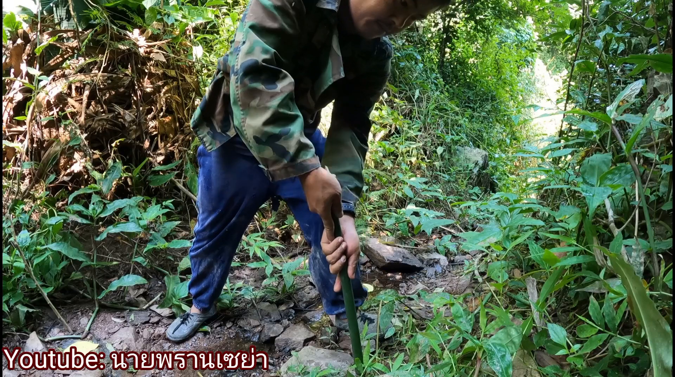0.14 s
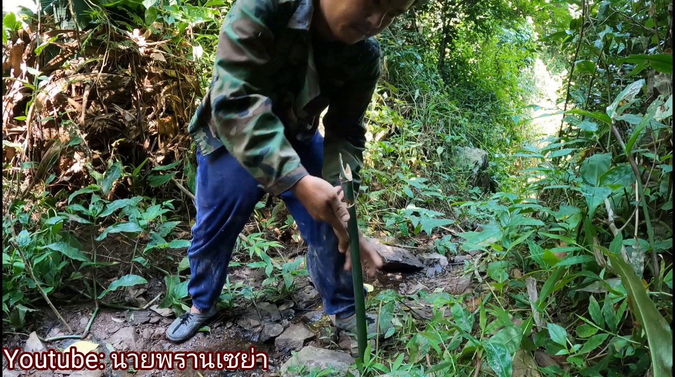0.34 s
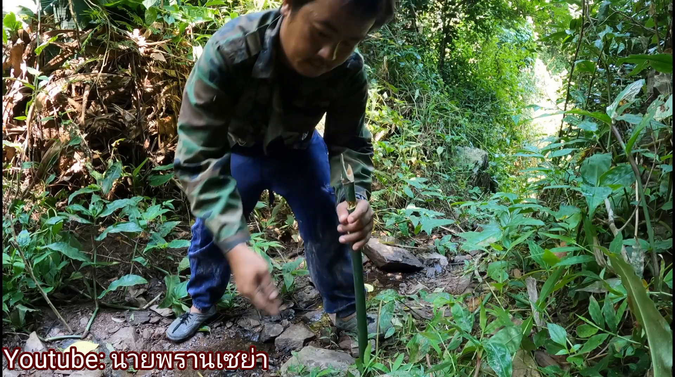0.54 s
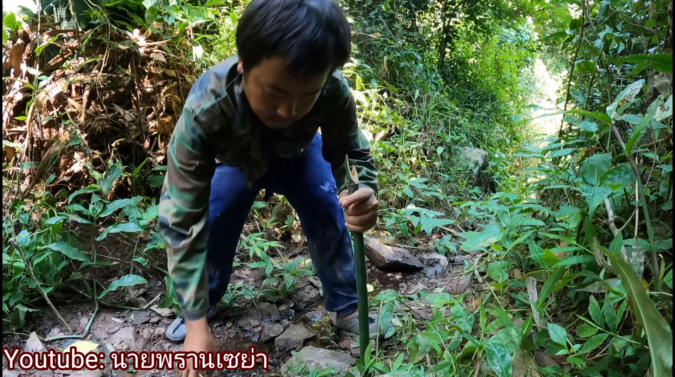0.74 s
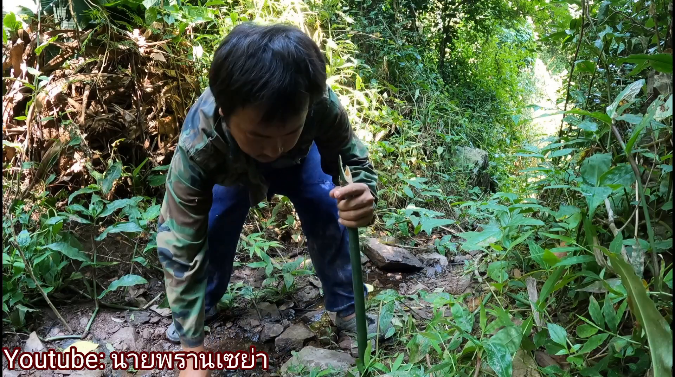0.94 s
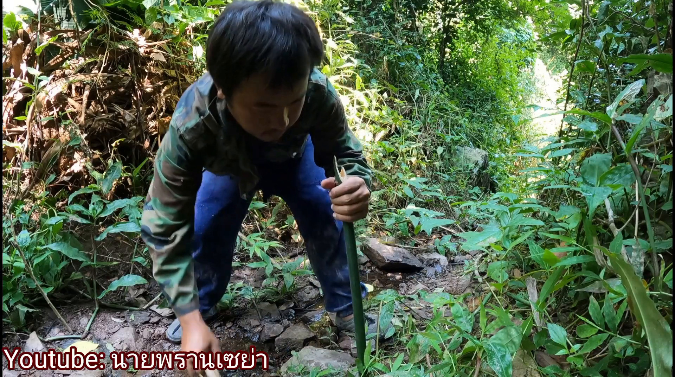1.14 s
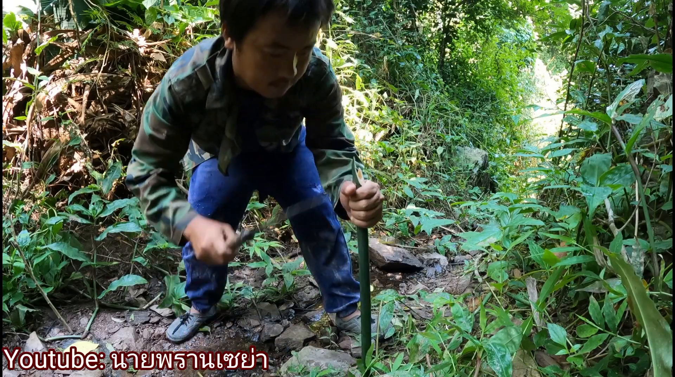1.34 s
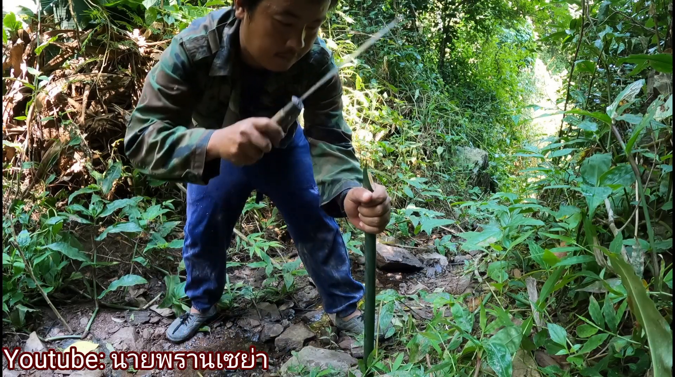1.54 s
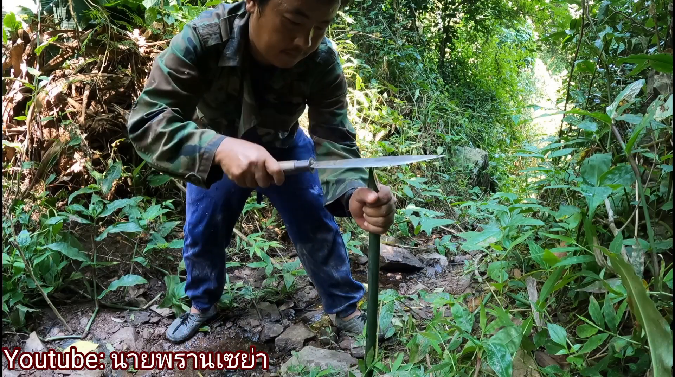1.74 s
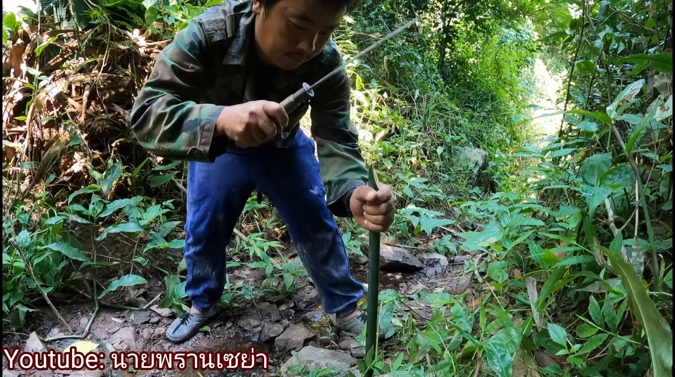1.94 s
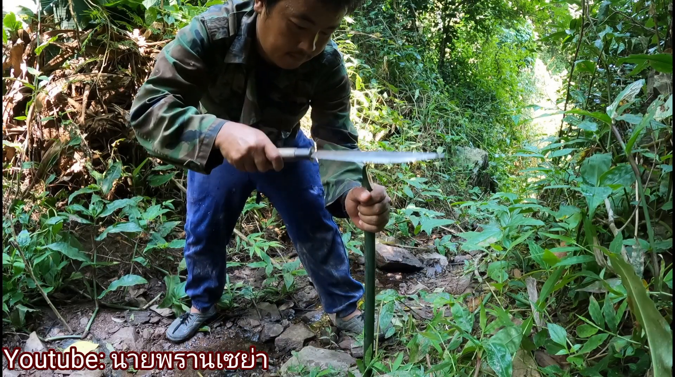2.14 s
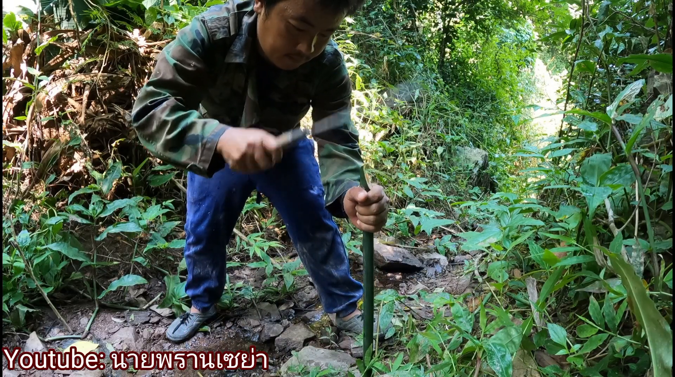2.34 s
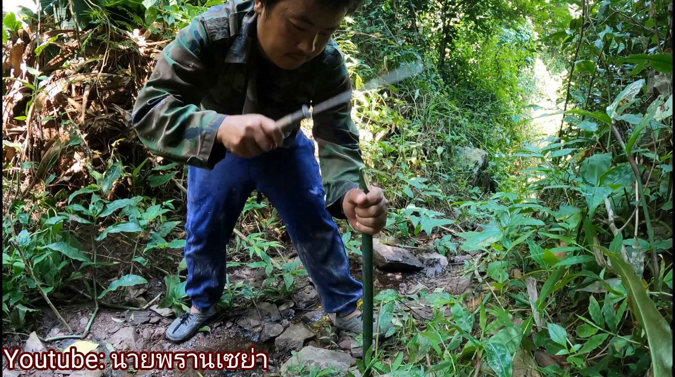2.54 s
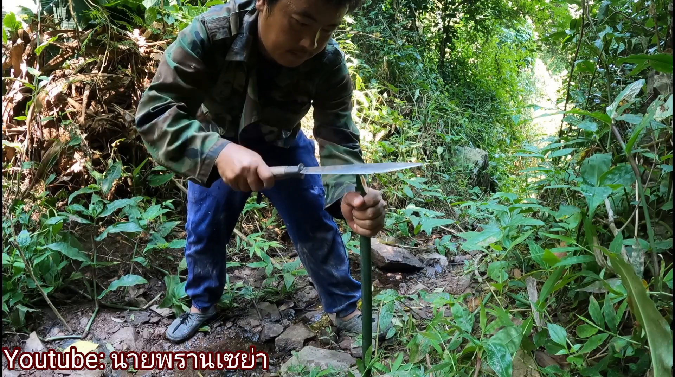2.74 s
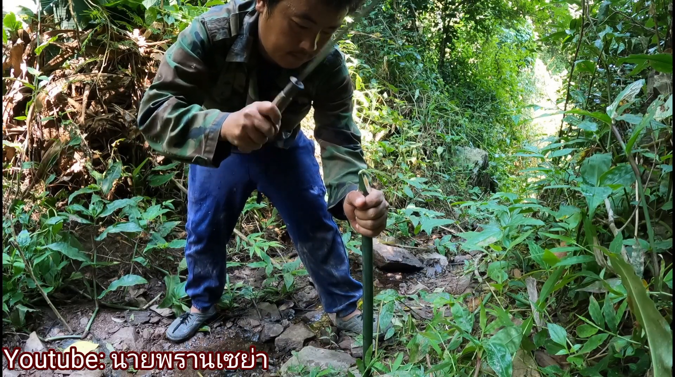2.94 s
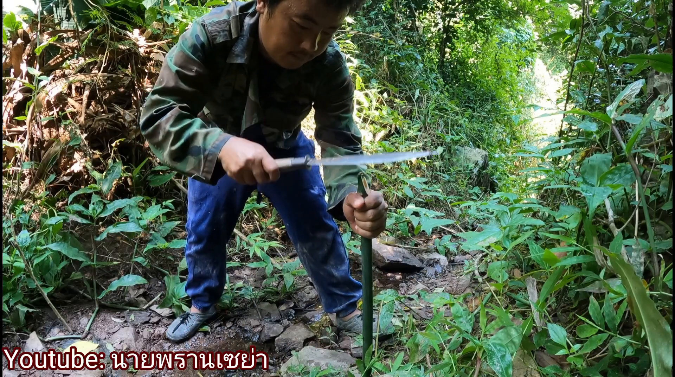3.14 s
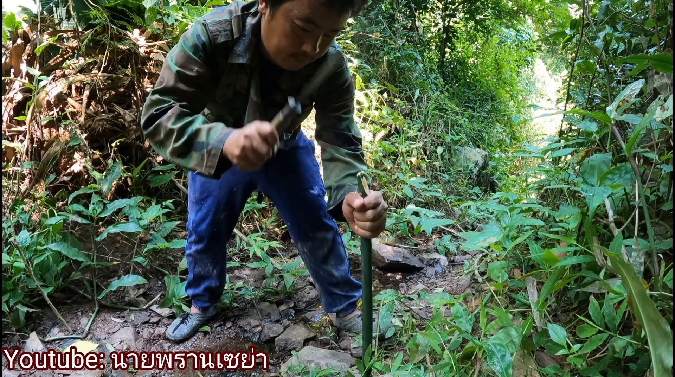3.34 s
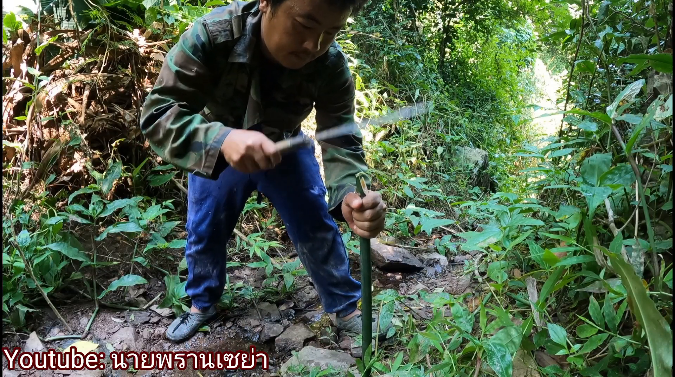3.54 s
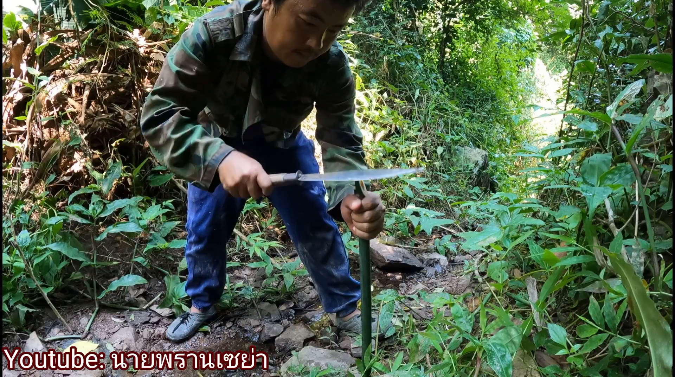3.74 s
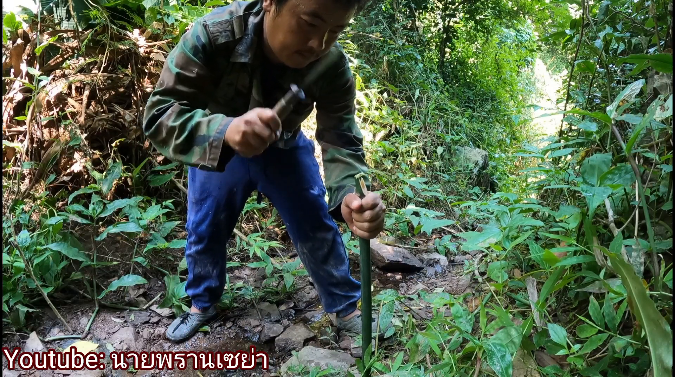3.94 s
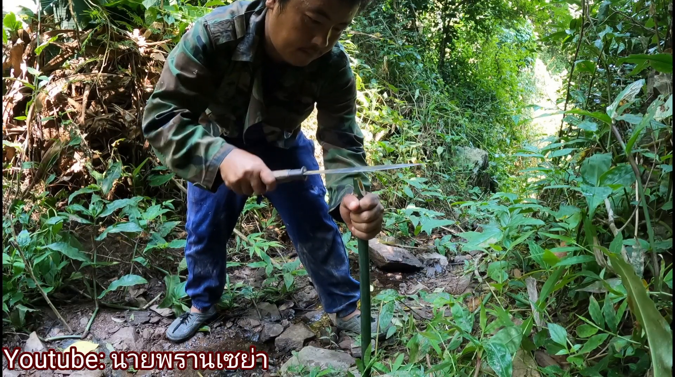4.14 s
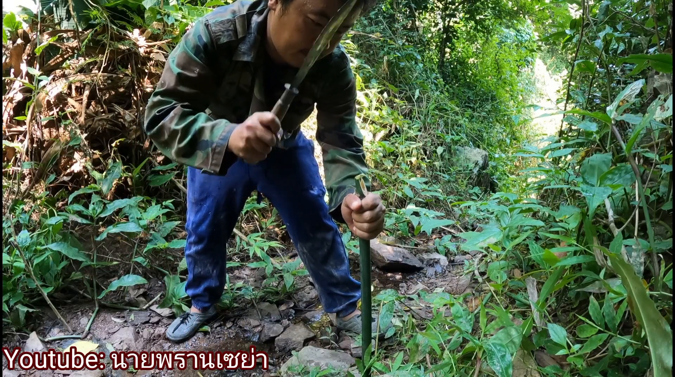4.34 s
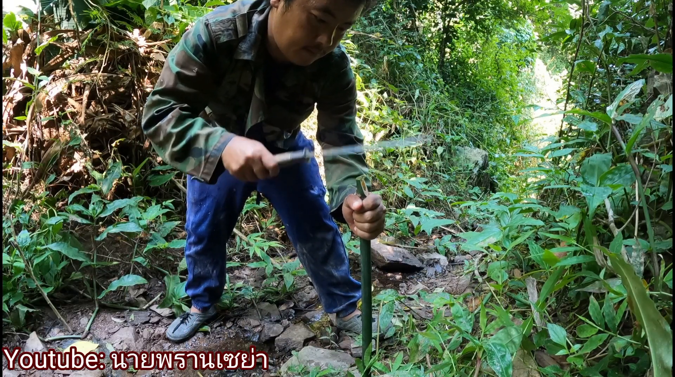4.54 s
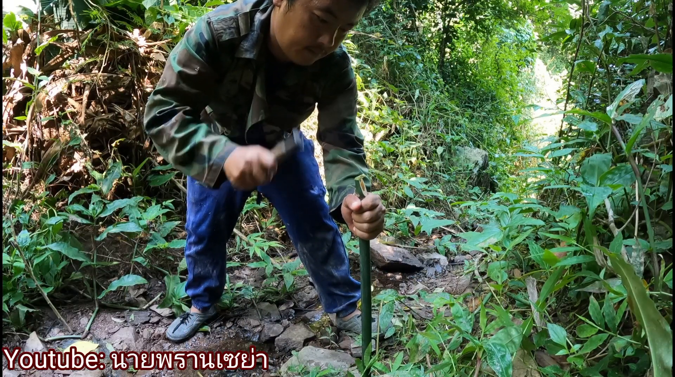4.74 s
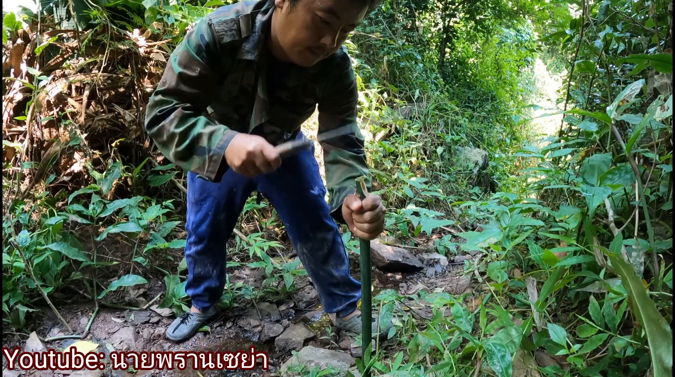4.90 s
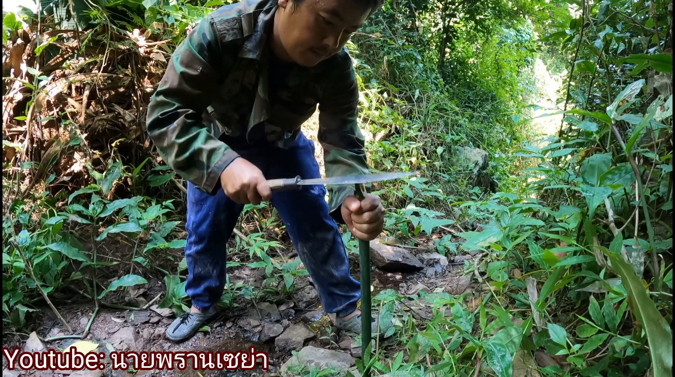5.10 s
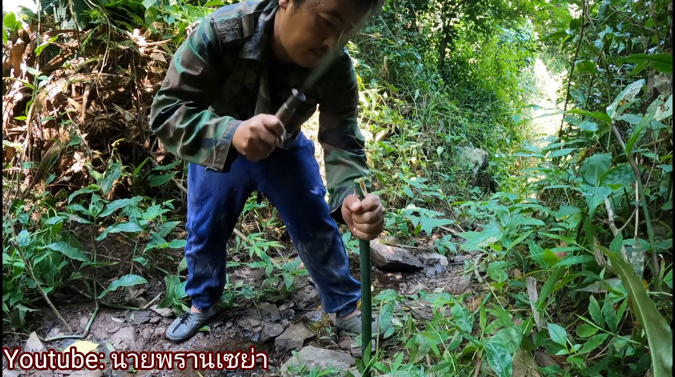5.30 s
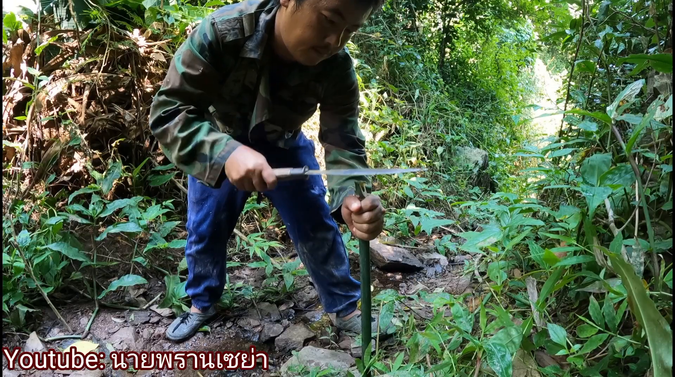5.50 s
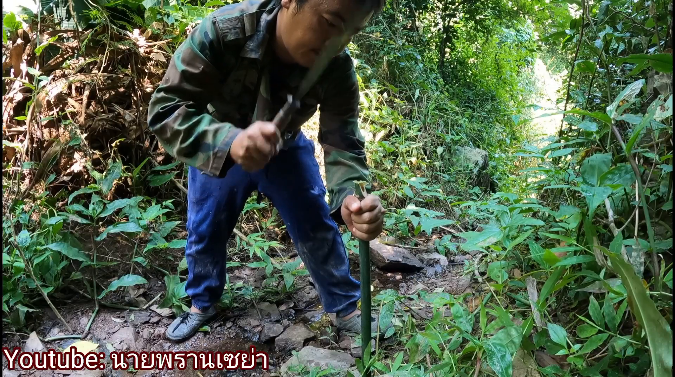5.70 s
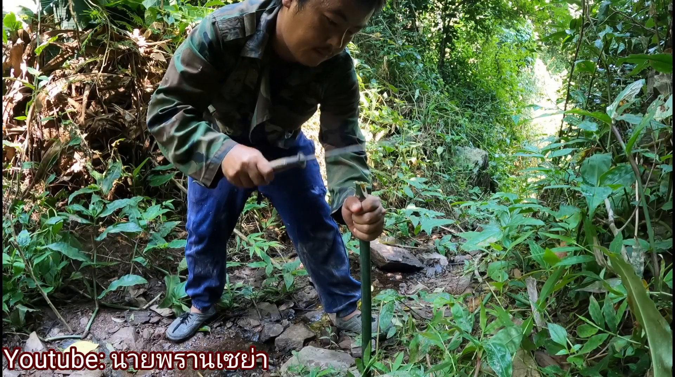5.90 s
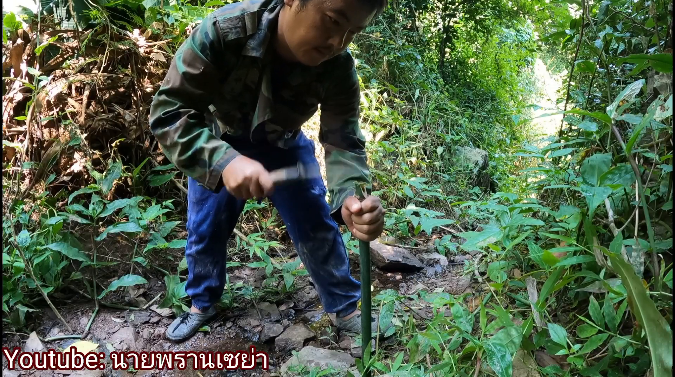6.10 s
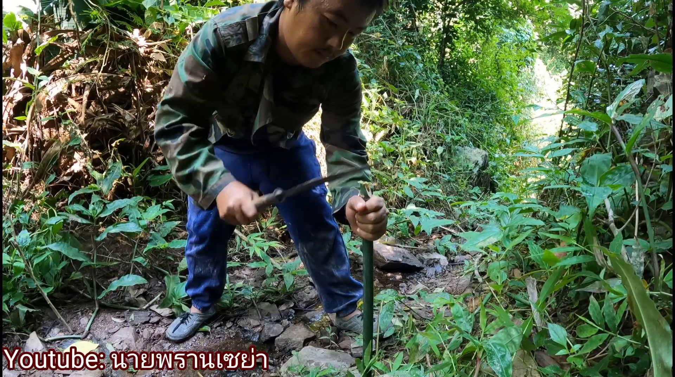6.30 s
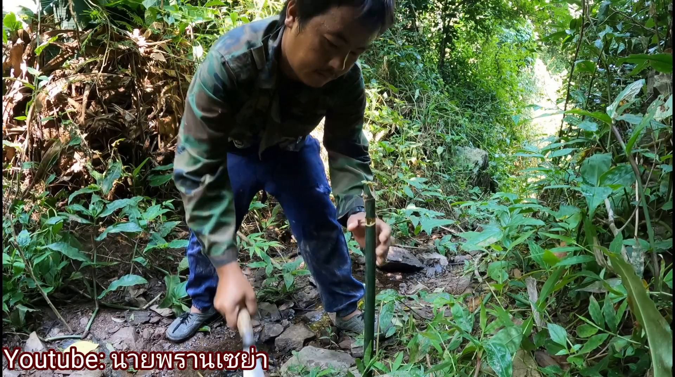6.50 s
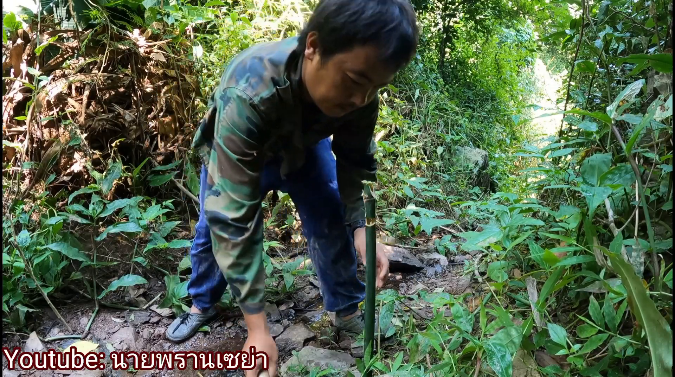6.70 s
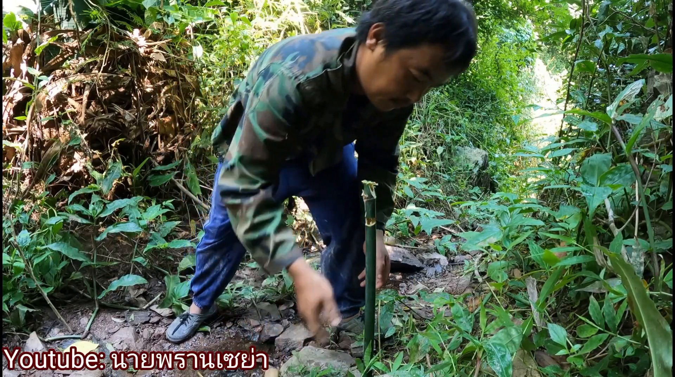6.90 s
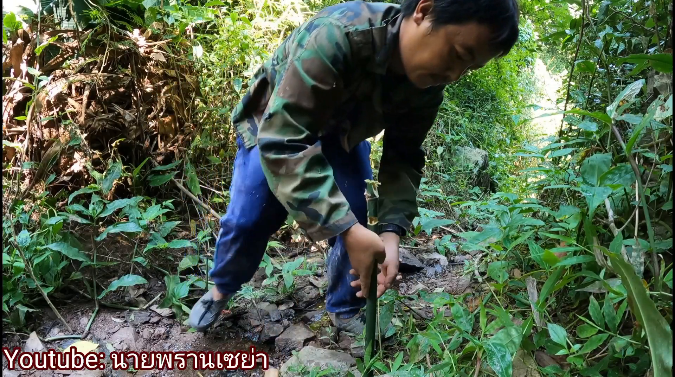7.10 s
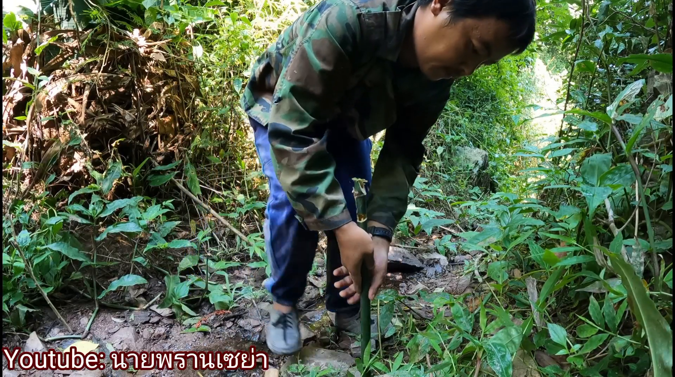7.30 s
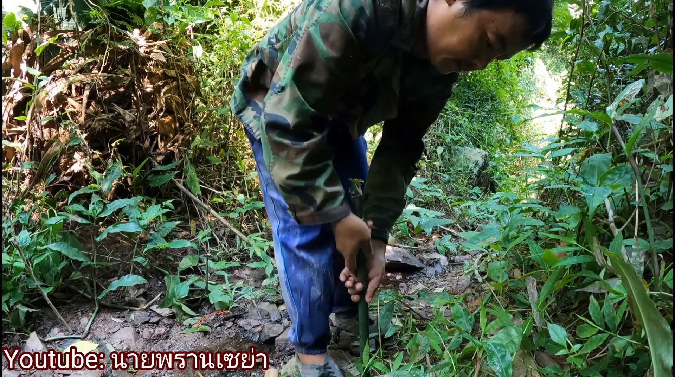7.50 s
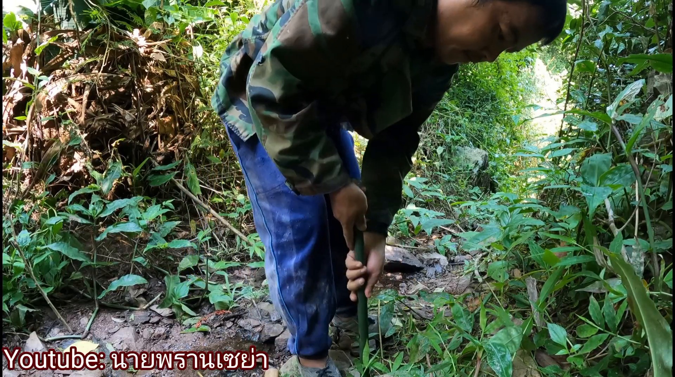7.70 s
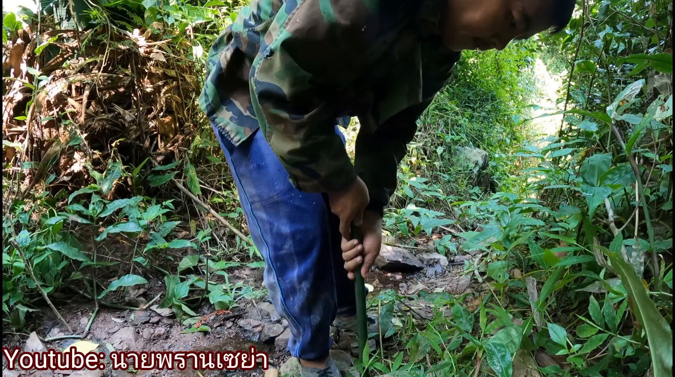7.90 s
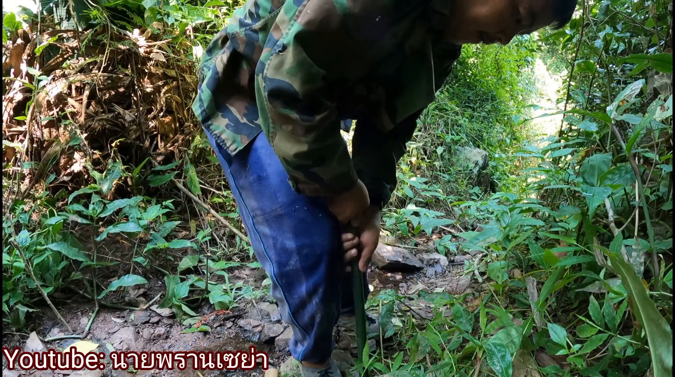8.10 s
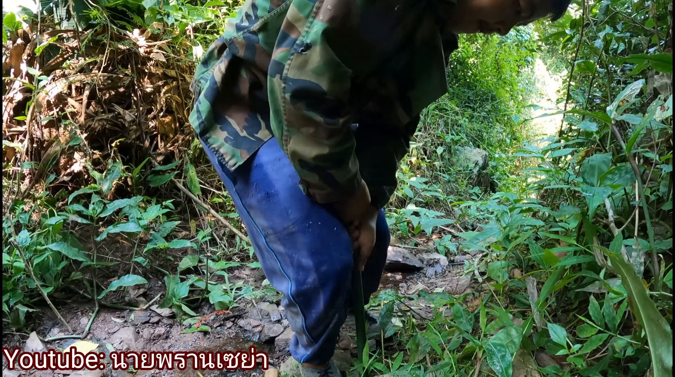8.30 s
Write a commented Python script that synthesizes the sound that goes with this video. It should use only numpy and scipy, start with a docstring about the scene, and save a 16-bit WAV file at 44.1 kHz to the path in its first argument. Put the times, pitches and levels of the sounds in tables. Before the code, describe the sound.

Still forest air, a low hum and thin hiss, lies under the whole scene. From 0 to 1.8 s clothes and leaves rustle softly as a person shifts grip and stoops; small stones tick, with a duller knock near 1.1 s, and soft dull pops bump the microphone, more on the right. From 1.9 to 6.3 s fourteen machete blows strike a bamboo stake, one every third of a second: dry, bright cane clatter, a hard crack at the foot, a short thud and a faint high steel ring. The thud rises in pitch, the rebound weakens and the hollow tone, heard from the third blow, is choked. Brief diffuse echoes return from foliage. At 7.0 s the blade lands on stones with a quick bouncing metallic clatter and scrape. Grit clicks around 7.2 and 7.7 s, cloth rustles more strongly from 7.5 s, and heavy pops thump at 7.6 and 8.1 s.

```python
"""Driving a bamboo stake

On a forest trail, a few steps ahead of two microphones, fourteen machete blows drive a bamboo stake into stony ground.
Filtered noise and dying sines make the cane's clatter, the crack of its foot, the thud and the singing blade.
Noise echoes are the foliage. The blade is thrown onto the stones afterwards, and grit ticks.
Shaped noise is the rustle of clothes and leaves and the still air; slowing sines are dull pops at the microphone."""
import sys
import numpy as np
from scipy import signal
from scipy.fft import irfft
from scipy.io import wavfile
from scipy.ndimage import uniform_filter1d, minimum_filter1d

SR = 44100
rng = np.random.default_rng(int(sys.argv[2]) if len(sys.argv) > 2 else 0)


def generate_wav(sig):
    """Save sig (samples, or channels by samples) to the path in sys.argv[1] as 16-bit PCM at SR."""
    pcm = np.round(np.clip(np.atleast_2d(sig).T, -1, 1) * 32767).astype(np.int16)
    wavfile.write(sys.argv[1], SR, pcm)


N = 368235  # samples in the scene
T = np.arange(SR // 2) / SR  # seconds since a hit
HZ = np.fft.rfftfreq(4096, 1 / SR)  # grid on which all spectra are read


def amp(db):
    """Decibels to gain."""
    return 10 ** (np.asarray(db) / 20)


def evened(x):
    """Scales to an rms of 1."""
    return x / np.sqrt(np.mean(x ** 2) + 1e-20)


def sized(x, db):
    """Scales a hit so that its energy, spread over 30 ms, has this level."""
    return x * amp(db) * np.sqrt(.03 * SR / (np.sum(x ** 2) + 1e-20))


def read(points):
    """Interpolates a spectrum in dB over log frequency, on the HZ grid."""
    hz, db = np.transpose(points)
    return np.interp(np.log(HZ + 1), np.log(hz + 1), db)


def add(mix, start_s, sound):
    """Mixes a sound in at its start."""
    part = mix[..., max(round(start_s * SR), 0):][..., :sound.shape[-1]]
    part += sound[..., :part.shape[-1]]


def decay(t60):
    """Falls by 60 dB in t60 seconds."""
    return np.exp(-np.log(1000) * T / t60)


def colour(x, db):
    """Causal minimum-phase filter with the gain db on the HZ grid."""
    half = np.log(amp(db))
    full = np.r_[half, half[-2:0:-1]]
    taps = np.fft.ifft(np.exp(np.conj(signal.hilbert(full)))).real
    return signal.oaconvolve(x, taps[:len(HZ)])[:len(x)]


def ring(modes, pitch=1, damping=1, uneven_db=0):
    """Dying sines; how strongly each one sounds depends on where the thing is hit, here by chance."""
    out = np.zeros(len(T))
    for k, (hz, db, t60) in enumerate(modes):
        strength = (-1) ** k * amp(db + uneven_db * rng.standard_normal())
        out += strength * decay(t60 / damping) * np.sin(2 * np.pi * hz * pitch * T)
    return out


def pair(make, likeness):
    """Two channels that share a part of their sound."""
    share = np.clip(likeness, 0, 1)
    return np.sqrt(share) * make() + np.sqrt(1 - share) * np.array([make(), make()])


def by_chance(per_s):
    """Random moments through the scene, on average so many a second."""
    moments = np.cumsum(rng.exponential(1 / per_s, size=100))
    return moments[moments < N / SR]


# Colour of the still air under the trees: pitch_hz [Hz], level_db [relative dB per Hz]
FOREST_COLOUR = [(15, -3.5), (25, -7), (53, 8.5), (97, -21), (170, 8.5), (714, -11), (840, -11.5),
                 (1190, -2.5), (3520, -9), (5000, -12.5), (7510, -16), (11300, -115.5), (12900, -26.5),
                 (14400, -83), (16000, -51.5)]
FOREST_DB = -57.5


def forest(swell_db=1):
    """Still air under the trees: a low hum of distance and a thin hiss, slowly swelling."""
    t = np.arange(N) / SR
    waves = [np.sin(2 * np.pi * (hz * t + rng.random())) / np.sqrt(hz) for hz in np.geomspace(.3, 8, 20)]
    swell = evened(sum(waves))
    air = pair(lambda: evened(colour(rng.standard_normal(N), read(FOREST_COLOUR))), likeness=0.52)
    return amp(FOREST_DB + swell_db * swell) * air


# Colour of cloth and leaves: pitch_hz [Hz], level_db [relative dB per Hz]
RUSTLE_COLOUR = [(180, -28.5), (300, -7), (440, -10.5), (787, -10.5), (1320, -2), (2520, -4.5), (5160, 1.5),
                 (5800, -2), (7200, -1), (12100, -14), (14000, -20.5), (16000, -69.5)]
# Movements of the body: shifting grip, stooping for the blade, rising, throwing it down, stepping up to the stake:
# start_s [s], length_s [s], level_db [dB before the overall rustle level]
MOVES = [(0.133, 0.031, -51.5), (0.296, 0.1, -53), (0.627, 0.18, -52.5), (1.047, 0.25, -56),
         (1.268, 0.055, -50.5), (1.375, 0.19, -53.5), (1.57, 0.064, -55.5), (6.55, 0.054, -61),
         (7.207, 0.042, -56), (7.533, 0.33, -46.5), (7.886, 0.2, -51.5), (8.228, 0.096, -50)]
MOVE_ATTACK_S, MOVE_RELEASE_S = 0.024, 0.075  # each swells, holds and dies away
STANDING_DB, WORKING_DB = -61.5, -72  # on the same scale: between movements, and while only the arm swings


def crackle(grains_per_s=900, spread_db=3, rub_db=-2):
    """Leaves and cloth as random grains of uneven strength over a steady rub of noise."""
    strength = amp(spread_db * np.minimum(rng.exponential(1, N), 3))
    grains = (rng.random(N) < grains_per_s / SR) * rng.standard_normal(N) * strength
    rub = amp(rub_db) * rng.standard_normal(N)
    return evened(colour(evened(grains) + rub, read(RUSTLE_COLOUR)))


def flap(flap_hz=170):
    """Loose cloth flaps as noise with one broad low hump."""
    hump = -10 * np.log10(1 + (2 * np.log2((HZ + 1) / flap_hz)) ** 4)
    return evened(colour(rng.standard_normal(N), hump))


def rustle(level_db=2.0, flutter_db=-0.1, flap_db=-5):
    """Cloth rubs and flaps and leaves crackle as the body moves; little of it while the arm alone swings."""
    t = np.arange(N) / SR
    hammering = (t > BLOWS[0][0]) & (t < BLOWS[-1][0])
    motion = amp(np.where(hammering, WORKING_DB, STANDING_DB))
    for start_s, length_s, db in MOVES:
        attack = np.clip((t - start_s) / MOVE_ATTACK_S, 0, 1)
        release = np.exp(-np.maximum(t - start_s - length_s, 0) / MOVE_RELEASE_S)
        motion = np.maximum(motion, amp(db) * attack * release)
    flutter = flutter_db * evened(uniform_filter1d(rng.standard_normal(N), size=700))
    cloth = pair(lambda: crackle() + amp(flap_db) * flap(), likeness=0.67)
    return motion * amp(level_db + flutter) * cloth


# The stronger dull pops at the microphone: start_s [s], level_db [dB before the overall pop level]
POPS = [(0.0147, -21), (0.0986, -17.5), (.125, -22.5), (0.1445, -26), (0.3506, -27.5), (0.4058, -20.5),
        (.644, -23), (0.7347, -17.5), (1.4557, -23.5), (1.7527, -20.5), (1.7673, -24.5), (1.8335, -23.5),
        (1.9638, -19), (2.067, -18.5), (2.1886, -22.5), (2.3474, -23.5), (2.7493, -28.5), (2.996, -19.5),
        (3.1847, -26.5), (3.3224, -31.5), (3.4795, -23), (3.6294, -18.5), (4.189, -20.5), (4.686, -33.5),
        (4.9046, -20.5), (5.568, -36.5), (5.802, -30), (6.2105, -24), (6.2768, -28), (6.4338, -19.5),
        (6.4773, -25.5), (6.7923, -30), (7.479, -31.5), (7.62, -10), (7.77, -14), (7.813, -24),
        (8.1104, -7)]
COMPANION_DB, CLUSTER_S = -15.5, 0.019  # each has a weaker companion, typically this far before or after it


def pop(stretch, drop_hz=430, end_hz=24, fall_s=0.0033, uneven=0.14, t60=0.1,
        tick_s=0.00014, tick_db=1, hiss_db=-32):
    """A sharp dip in pressure, then a hissing swing that slows from a knock to a low thump."""
    dip = -amp(tick_db) * T / tick_s * np.exp(1 - T / tick_s)
    fall = np.exp(-T / (fall_s * np.exp(uneven * stretch)))
    swing = np.sin(2 * np.pi * np.cumsum(end_hz + drop_hz * fall) / SR)
    hiss = amp(hiss_db) * colour(rng.standard_normal(len(T)), read(RUSTLE_COLOUR))
    return dip + (swing + hiss) * decay(t60)


def pops(level_db=-4.0):
    """Pressure pops at the microphone, each with a weaker companion; stronger on the right."""
    out = np.zeros(N)
    for start_s, db in POPS:
        lag, slow, slower = rng.standard_normal(3)
        add(out, start_s, amp(db + level_db) * pop(slow))
        add(out, start_s + CLUSTER_S * lag, amp(db + COMPANION_DB + level_db) * pop(slower))
    return out * amp([[-7.5], [0]])


# Course of the echo from the foliage: delay_s [s], level_db [relative dB]
SCATTER_COURSE = [(0, 19), (.03, 2), (.06, -6), (.125, -9), (.2, -29.5), (.35, -15), (.6, -65.5)]
# Colour of that echo: pitch_hz [Hz], level_db [relative dB]
SCATTER_COLOUR = [(100, -7), (400, -38), (900, -4), (1500, -6.5), (2500, -0.5), (5000, 0.5), (8000, 3.5),
                  (15000, -1)]


def foliage(x, wet_db=-18, first_s=0.012):
    """Countless weak echoes from the bank and the leaves; three random patterns take turns."""
    course = amp(np.interp(T, *np.transpose(SCATTER_COURSE))) * (T > first_s)
    out = np.zeros((2, N))
    for k in range(3):  # the turns keep constant power
        turn = np.sqrt(2 / 3) * np.cos(np.pi * (np.arange(N) / SR + k / 3))
        taps = pair(lambda: colour(rng.standard_normal(len(T)) * course, read(SCATTER_COLOUR)), likeness=0.56)
        taps = taps / np.linalg.norm(taps[0])
        out += signal.fftconvolve((turn * x)[None], taps, axes=1)[:, :N]
    return amp(wet_db) * out


# Phase between the two microphones for what lies ahead: pitch_hz [Hz], left_lead_rad [radians]
LEAD = [(200, 0), (1000, -.35), (2500, -.65), (5000, -.55), (9000, -.6), (14000, -.8)]
# Level between the two microphones: pitch_hz [Hz], left_minus_right_db [dB]
SIDES = [(60, 0.0), (110, 0.5), (200, 0.0), (380, 0.0), (700, -0.12), (1290, -1.0), (2380, -0.5),
         (4400, -0.5), (8120, 0.24), (15000, 0.5)]


def placed(x, left_db=0):
    """The two microphones hear the same sound with small differences of phase and level."""
    half = amp((read(SIDES) + left_db) / 2) * np.exp(.5j * read(LEAD))
    taps = np.fft.fftshift(irfft(np.array([half, 1 / half])), axes=1)
    return signal.oaconvolve(x[None], taps, axes=1)[:, len(HZ) - 1:][:, :N]


def chip(db, hz, octaves, t60, grainy_db=3):
    """A short grainy noise burst with one broad resonance, dulled above 9 kHz."""
    hump = -10 * np.log10(1 + (np.log2((HZ + 1) / hz) / octaves) ** 4)
    grain = amp(grainy_db * evened(uniform_filter1d(rng.standard_normal(len(T)), size=50)))
    air = -10 * np.log10(1 + (HZ / 9000) ** 8)
    return sized(colour(rng.standard_normal(len(T)) * grain * decay(t60), hump + air), db)


# Stones and twigs underfoot and under the hand: start_s [s], level_db [dB], pitch_hz [Hz, centre], t60_s [s]
GRIT = [(0.097, -50.5, 4450, 0.0027), (0.33, -49, 3000, .014), (0.438, -44.5, 4160, .034),
        (1.114, -36.5, 980, 0.025), (1.248, -47, 3720, .075), (1.63, -52.5, 2430, .07),
        (1.794, -52, 2800, .034), (2.134, -54, 2550, .023), (3.042, -52, 1900, 0.058),
        (5.882, -61, 2400, 0.04), (6.907, -45.5, 3900, 0.19), (7.183, -48, 3770, 0.11),
        (7.2248, -41.5, 2900, .033), (7.232, -41, 3350, 0.058), (7.238, -38, 2500, .034),
        (7.654, -41, 590, 0.31), (7.682, -34, 3330, 0.12), (7.691, -41.5, 755, 0.039),
        (7.733, -41.5, 1280, 0.077)]
GRIT_OCTAVES = 0.77  # width of their resonance


def grit(faint_per_s=1.2, faint_db=-59, faint_hz=3000, faint_t60=.04):
    """Small stones knock and twigs snap as short resonant bursts; fainter ones tick by chance."""
    out = np.zeros(N)
    for start_s, db, hz, t60 in GRIT:
        add(out, start_s, chip(db, hz, GRIT_OCTAVES, t60))
    for start_s in by_chance(faint_per_s):
        add(out, start_s, chip(faint_db, faint_hz, GRIT_OCTAVES, faint_t60))
    return out


# Modes of the blade's steel: pitch_hz [Hz], level_db [relative dB], t60_s [s before extra damping]
BLADE_MODES = [(210, -27, .25), (657, -33, .25), (1200, -27, .15), (2126, -16, .12), (2902, -7, .16),
               (3226, 0, .16), (3290, -6, .1), (3358, -4, .16), (3542, -13, .13), (3903, -12, .16),
               (4235, 0, .12), (4273, -4, .12), (4608, -9, .13), (4733, -5, .13), (4963, -7, .14),
               (5098, 1, .13), (5143, 0, .14), (5878, -6, .11), (5927, -2, .13), (6055, -5, .11),
               (6090, -4, .11), (6266, -11, .13), (6800, -14, .1), (7456, -16, .12), (7886, -10, .3),
               (8834, -12, .12), (8888, -13, .12), (10000, -17, .1)]
# Bounces of the thrown blade on the stones: start_s [s], level_db [dB, reference for its parts]
BOUNCES = [(6.9912, -18), (6.9962, -31), (7.0008, -23), (7.0243, -26), (7.0395, -30), (7.057, -39)]


def thrown_blade(free_db=-1.0, chatter_db=-3, scrape_hz=4900, scrape_db=-6, scrape_octaves=1.06):
    """Every bounce rings the free steel; against the stone its modes are detuned and short, and it scrapes."""
    out = np.zeros(N)
    for start_s, db in BOUNCES:
        chatter = sum(ring(BLADE_MODES, pitch=rng.uniform(.975, 1.025), damping=3, uneven_db=2)
                      for _ in range(3))
        scrape = chip(db + scrape_db, scrape_hz, scrape_octaves, t60=0.1)
        free = ring(BLADE_MODES, damping=1.3, uneven_db=2)
        add(out, start_s + rng.uniform(0, .0005), sized(free, db + free_db))
        add(out, start_s, sized(chatter, db + chatter_db) + scrape)
    return out


def held_blade():
    """One high mode of the steel sings, steady at first, then fading quickly."""
    hz, t60, fade_s = rng.uniform(7838, 7890), .7, .09
    return np.sin(2 * np.pi * hz * T) * decay(t60) * np.exp(-(T / fade_s) ** 2)


# Earth shaken by the stake: pitch_hz [Hz], level_db [relative dB per Hz]
SOIL_COLOUR = [(40, -22.5), (90, -1), (150, -1.5), (260, 2.5), (400, -30), (600, -5), (850, -19),
               (2000, -41.5)]


def thud(hz, t60=0.1, earth_t60=0.064, rise_s=0.00042, earth_db=-3):
    """The stake bobs on the springy ground as a dying sine and shakes the earth round it as noise."""
    bob = np.sin(2 * np.pi * hz * T) * decay(t60)
    earth = colour(rng.standard_normal(len(T)) * decay(earth_t60), read(SOIL_COLOUR))
    return (sized(bob, 0) + sized(earth, earth_db)) * (1 - np.exp(-T / rise_s))


# Blows on the stake: start_s [s], clatter_db [dB], crack_db [dB], blade_db [dB]
BLOWS = [(1.8910, -23.5, -23, -38), (2.2260, -21, -21.5, -42), (2.5508, -20, -22, -48),
         (2.8970, -21, -24.5, -29.5), (3.2385, -21, -22, -31), (3.5759, -22.5, -19, -46),
         (3.9155, -23.5, -17.5, -37.5), (4.2681, -23.5, -16, -43.5), (4.6117, -24, -17, -43),
         (4.9517, -25, -16.5, -32.5), (5.2824, -27, -21, -39.5), (5.6213, -27, -22, -50),
         (5.9524, -26.5, -20.5, -38), (6.3031, -25, -26.5, -60)]
# Dense short ring of the cane, before its tilt: pitch_hz [Hz], level_db [relative dB per Hz]
CLATTER_COLOUR = [(200, -21), (450, -25), (850, -26.5), (1050, 2.5), (1400, -10), (2000, -2.5),
                  (3000, -3.5), (4500, -2), (7000, -5.5), (8500, -13), (10000, -21), (12000, -24.5),
                  (14000, -46.5), (16000, -38)]
# Crack of its foot on stone: pitch_hz [Hz], level_db [relative dB per Hz]
CRACK_COLOUR = [(150, -8), (400, -8), (850, -10.5), (1150, 1), (1700, 3), (2400, 3.5), (3200, -4.5),
                (5000, -4.5), (7500, -15.5), (10000, -25), (13000, -22), (16000, -107.5)]
# Modes of the cane wall: pitch_hz [Hz], level_db [relative dB], t60_s [s]
CANE_MODES = [(1180, -5, .035), (1650, -2, .035), (2260, 0, .05), (2630, -3, .06), (2900, -1, .06),
              (3180, -1, .04), (3650, -5, .04), (4950, -6, .06)]
# Modes of the air inside the cane: pitch_hz [Hz], level_db [relative dB], t60_s [s]
HOLLOW_MODES = [(985, 0, .07), (1050, -1, .06)]
BRIGHT_DB_PER_OCTAVE = 0.65  # tilt of the clatter
# every blow seats the stake more firmly: the blade rebounds less, and the ground grows stiffer, so the thud rises
REBOUND_DB, REBOUND_DB_PER_BLOW = 1, -2  # second landing of the blade, relative to the first
LOOSE_HZ, FIRM_HZ, SEATING_BLOWS = 103.4, 158.3, 5.4  # thud pitch, and the blows it takes to go most of the way
THUD_DB, LOOSE_THUD_DB = -29, -4  # thud of the firm stake, and the change while it is loose
# the air in the cane sounds once its foot has bitten in, and is choked ever faster as soil fills it
BITE_BLOW = 2  # counted from 0
HOLLOW_DB, CHOKE_DB, CHOKE_POWER = -29.5, -36, 2.9


def blows(clatter_t60=0.034, wall_db=-7, rebound_t60=0.032):
    """The blade meets the cane, whose foot cracks on stone 2.1 ms later; a rebound lands ever more weakly."""
    foot_s, rebound_s, alike = .0021, .0058, .4
    out = np.zeros(N)
    cane = rng.standard_normal(len(T))
    tone = read(CLATTER_COLOUR) + BRIGHT_DB_PER_OCTAVE * np.log2((HZ + 100) / 3000)
    click = -1. * (T == 0)
    for k, (start_s, clatter_db, crack_db, blade_db) in enumerate(BLOWS):
        depth = k / (len(BLOWS) - 1)
        loose = np.exp(-k / SEATING_BLOWS)
        fresh, again = rng.standard_normal((2, len(T)))
        # the same cane, never hit on quite the same spot
        fibres = np.sqrt(alike) * cane + np.sqrt(1 - alike) * fresh
        add(out, start_s, sized(colour(fibres * decay(clatter_t60), tone), clatter_db))
        add(out, start_s, sized(ring(CANE_MODES, uneven_db=7.5), clatter_db + wall_db))
        if k >= BITE_BLOW:
            hollow_db = HOLLOW_DB + CHOKE_DB * depth ** CHOKE_POWER
            add(out, start_s, sized(ring(HOLLOW_MODES), hollow_db))
        add(out, start_s, sized(held_blade(), blade_db))

        add(out, start_s + foot_s, sized(colour(click, read(CRACK_COLOUR)), crack_db))
        thud_hz = FIRM_HZ + (LOOSE_HZ - FIRM_HZ) * loose
        add(out, start_s + foot_s, sized(thud(thud_hz), THUD_DB + LOOSE_THUD_DB * loose))

        rebound_db = clatter_db + REBOUND_DB + REBOUND_DB_PER_BLOW * k
        add(out, start_s + rebound_s, sized(colour(again * decay(rebound_t60), tone), rebound_db))
    return out


def scene():
    """The work a few steps ahead, its echo, and the quiet around it."""
    stake, blade, stones = blows(), thrown_blade(), grit()
    direct = placed(stake) + placed(blade + stones, left_db=1.2)
    scattered = foliage(stake + stones + amp(-9) * blade)
    return direct + scattered + pops() + rustle() + forest()


EDGE_HZ = 16300  # upper band limit


def record(dry):
    """A fast limiter holds the loudest peaks near full scale; then the band limit."""
    gain = 1 / np.maximum(abs(dry).max(0), 1)
    held = dry * uniform_filter1d(minimum_filter1d(gain, size=13), size=13)
    lowpass = signal.firwin(255, EDGE_HZ, window=("kaiser", 9), fs=SR)
    return signal.oaconvolve(held, lowpass[None], "same")


dry = scene()
out = record(dry)
generate_wav(out)
```